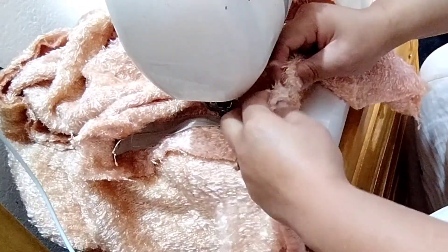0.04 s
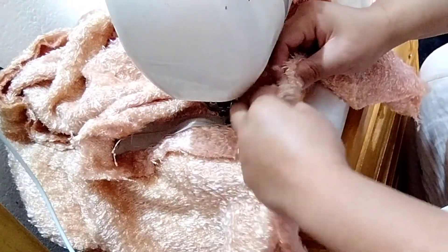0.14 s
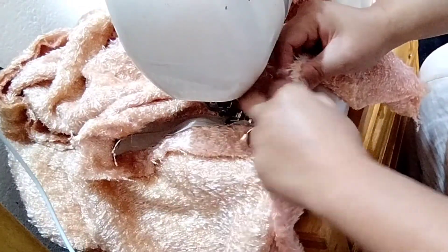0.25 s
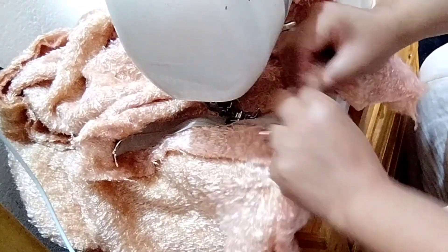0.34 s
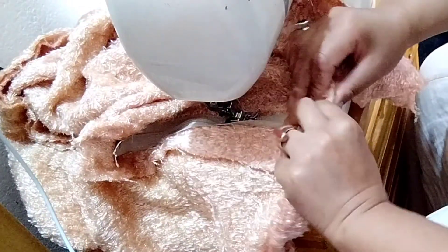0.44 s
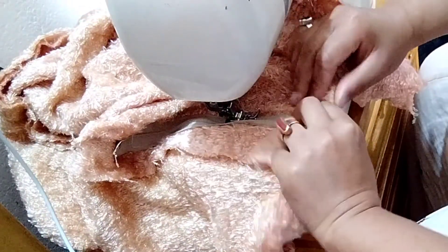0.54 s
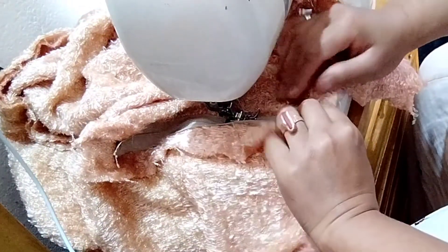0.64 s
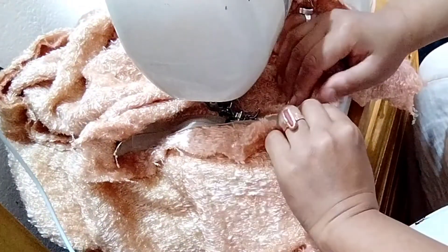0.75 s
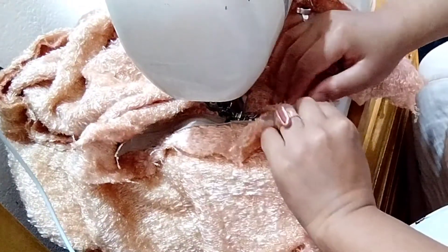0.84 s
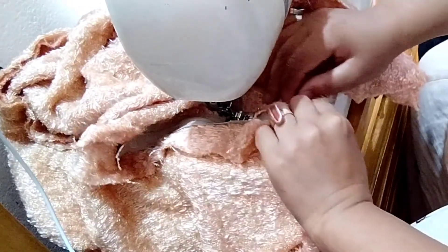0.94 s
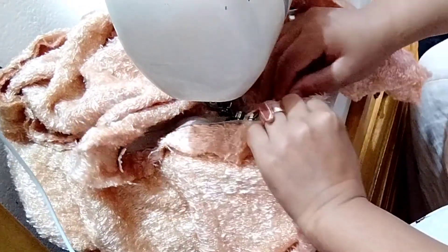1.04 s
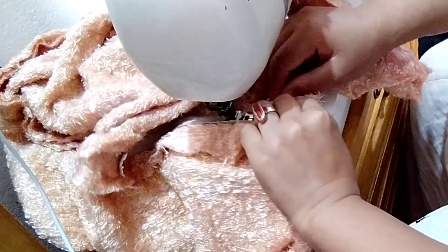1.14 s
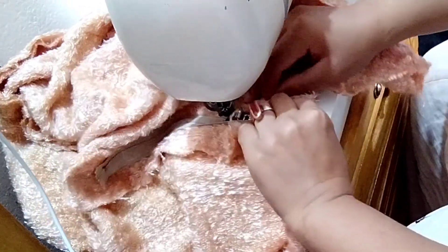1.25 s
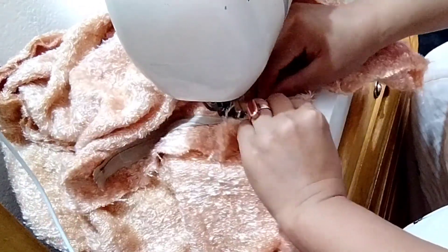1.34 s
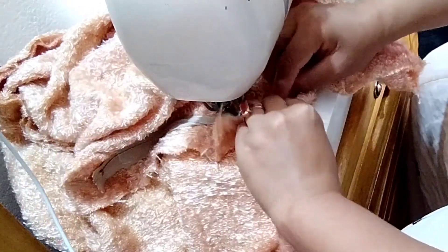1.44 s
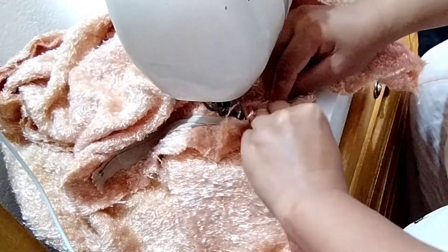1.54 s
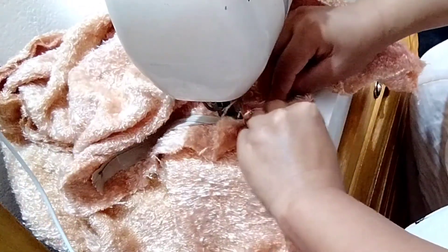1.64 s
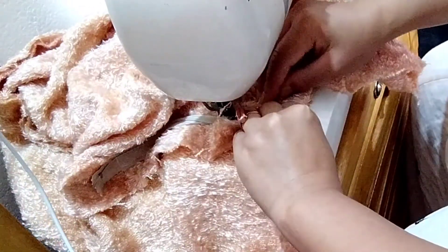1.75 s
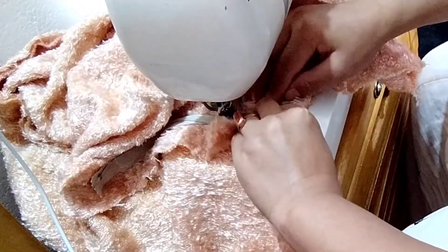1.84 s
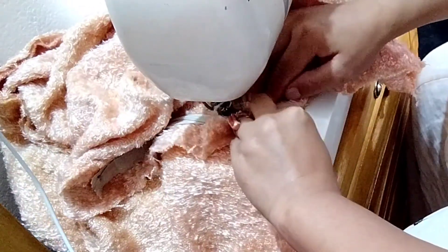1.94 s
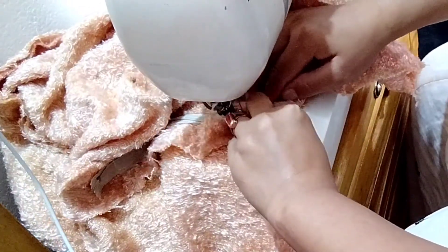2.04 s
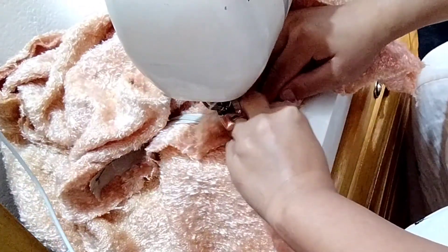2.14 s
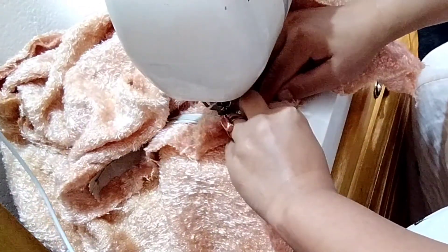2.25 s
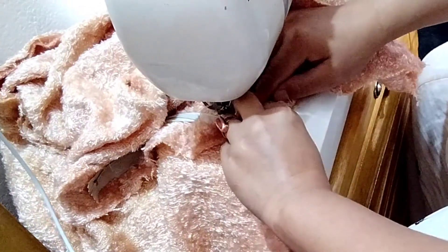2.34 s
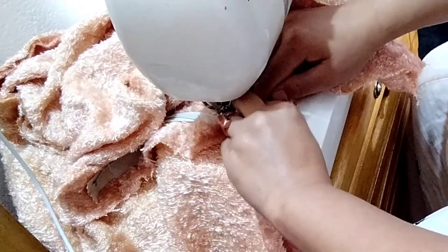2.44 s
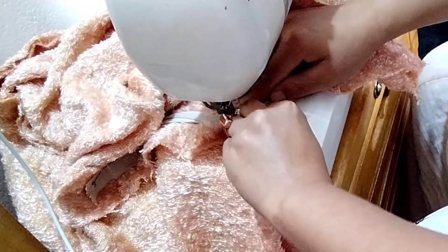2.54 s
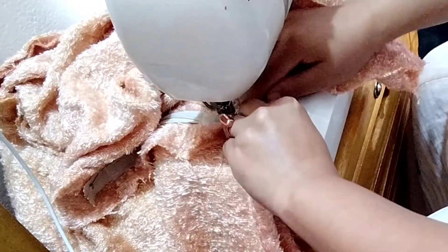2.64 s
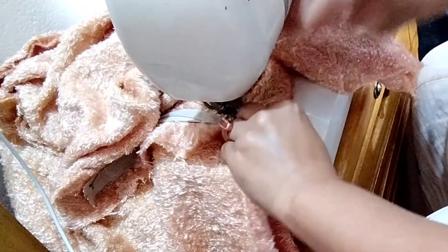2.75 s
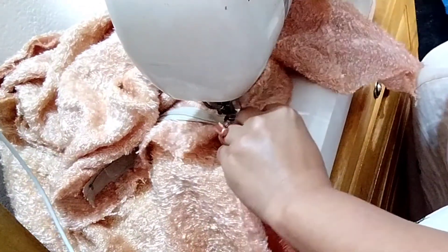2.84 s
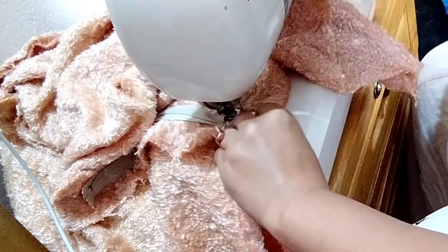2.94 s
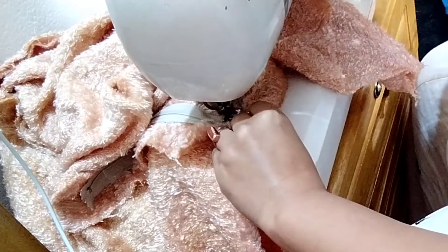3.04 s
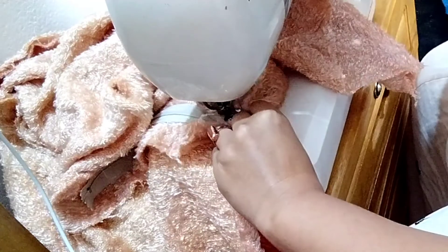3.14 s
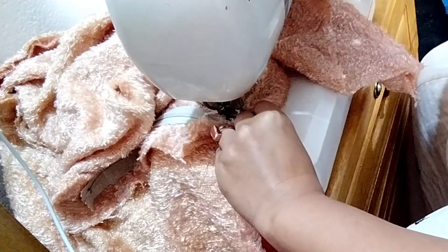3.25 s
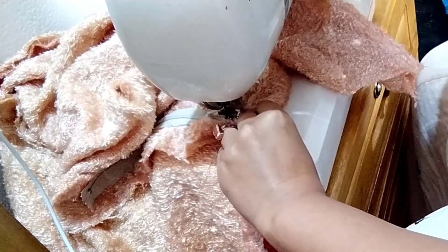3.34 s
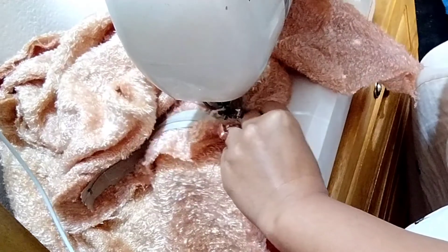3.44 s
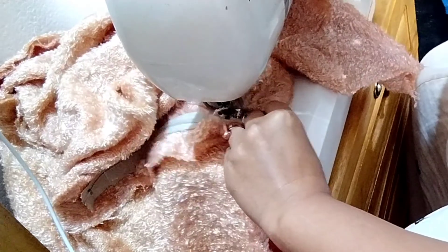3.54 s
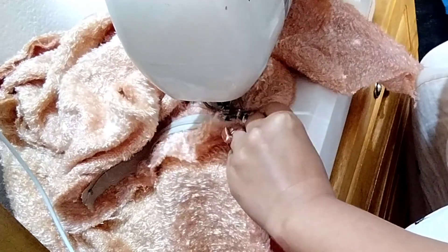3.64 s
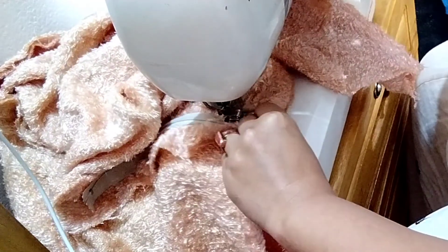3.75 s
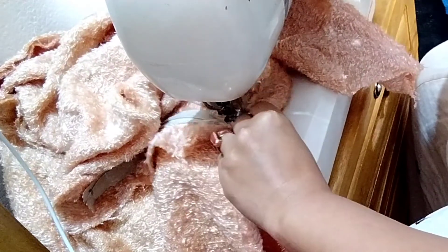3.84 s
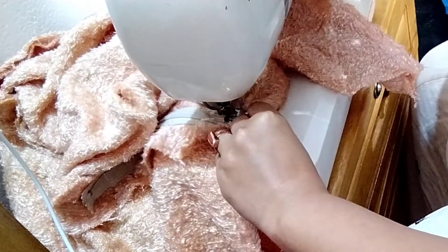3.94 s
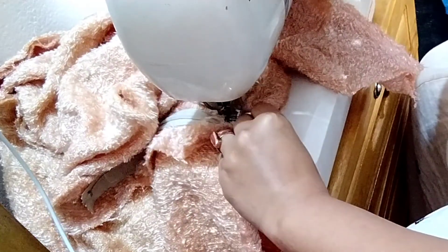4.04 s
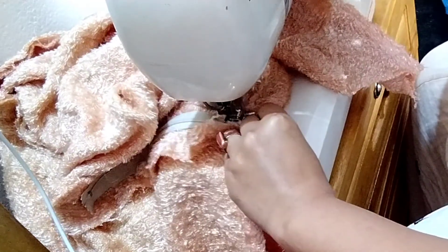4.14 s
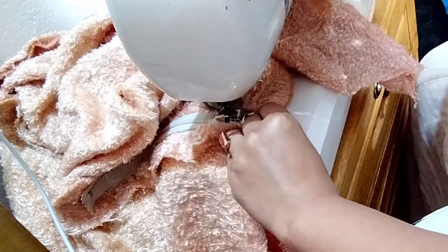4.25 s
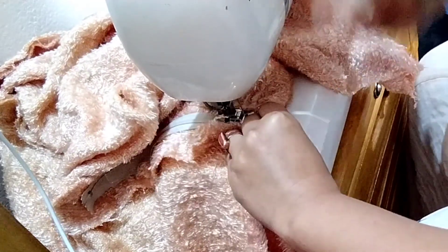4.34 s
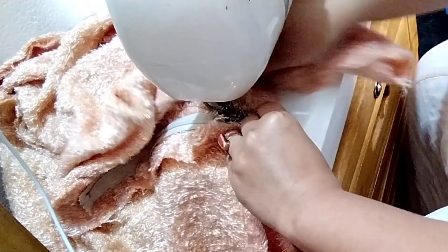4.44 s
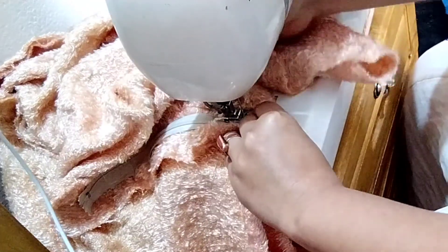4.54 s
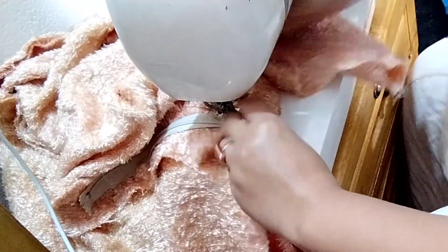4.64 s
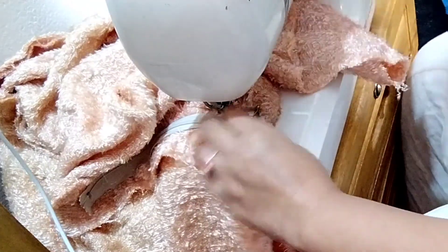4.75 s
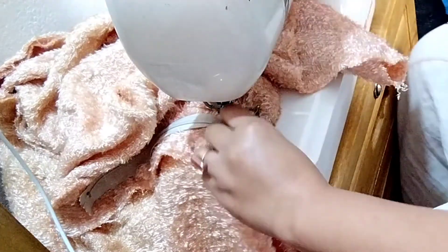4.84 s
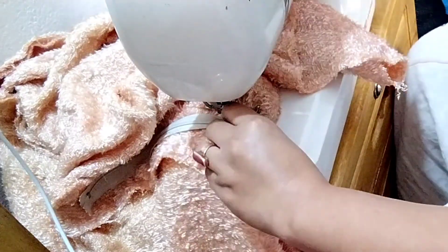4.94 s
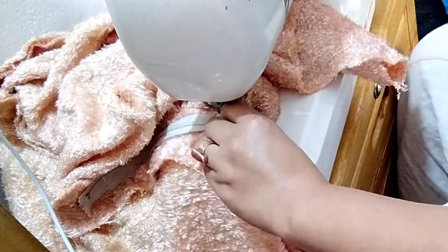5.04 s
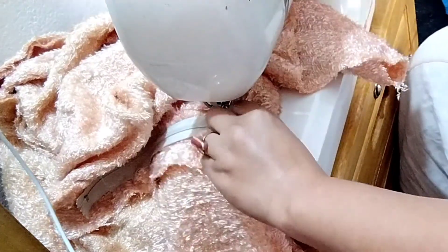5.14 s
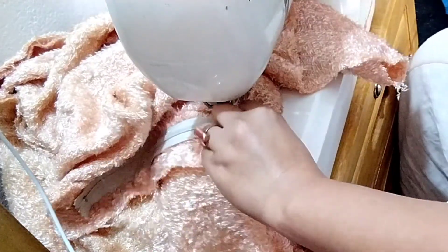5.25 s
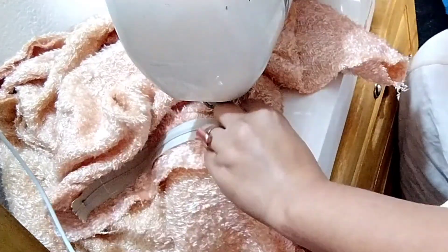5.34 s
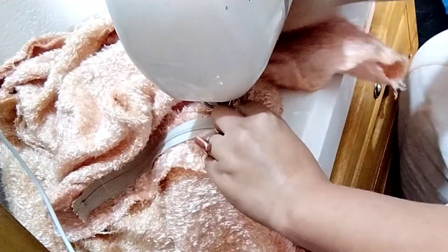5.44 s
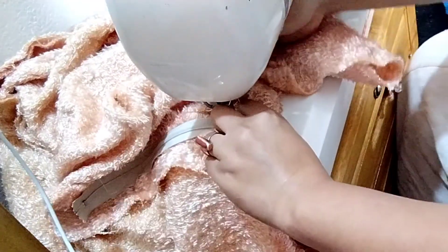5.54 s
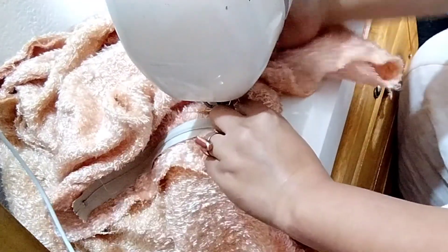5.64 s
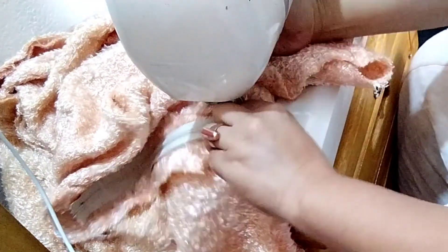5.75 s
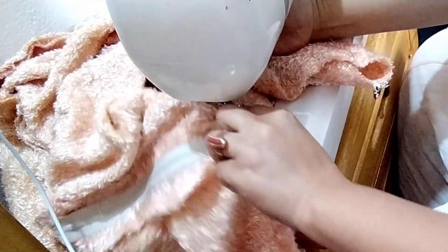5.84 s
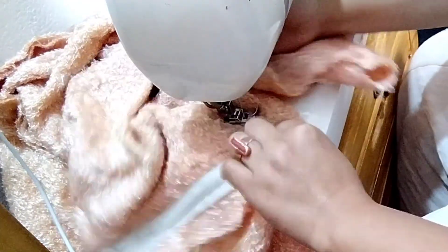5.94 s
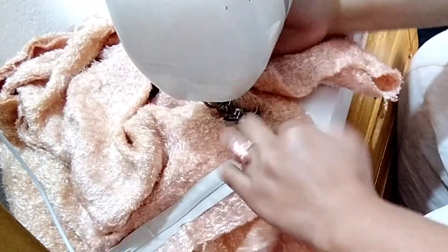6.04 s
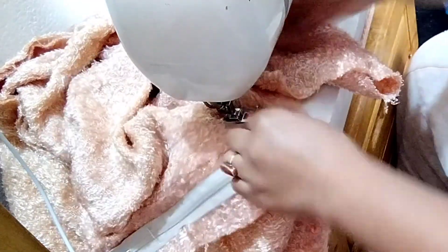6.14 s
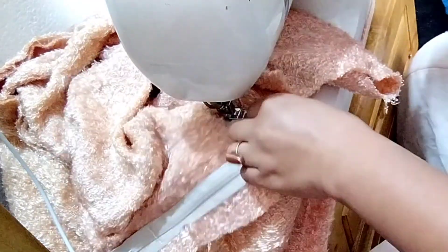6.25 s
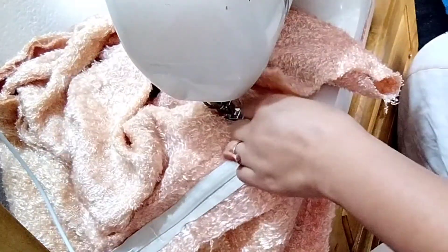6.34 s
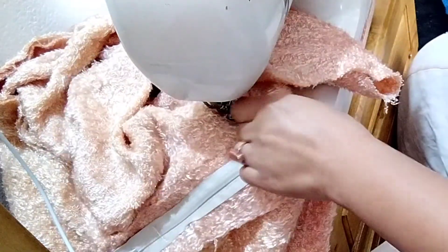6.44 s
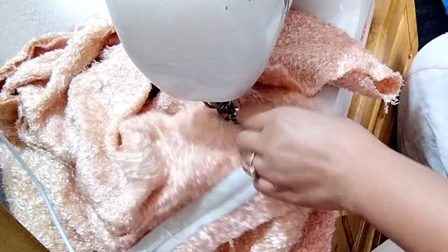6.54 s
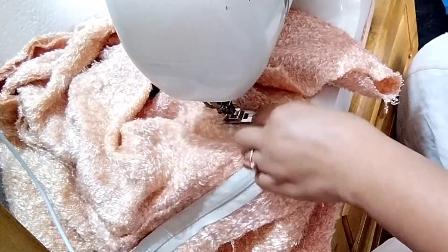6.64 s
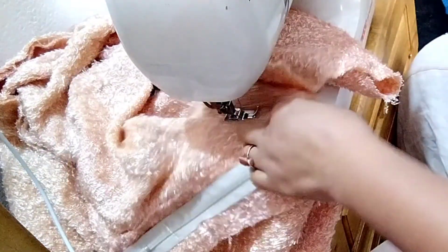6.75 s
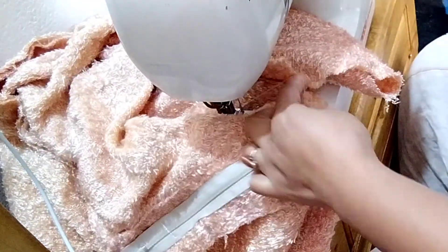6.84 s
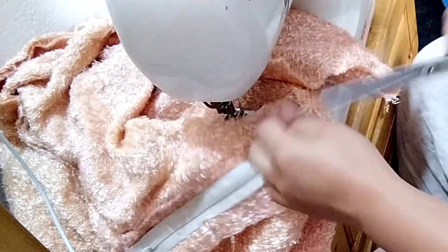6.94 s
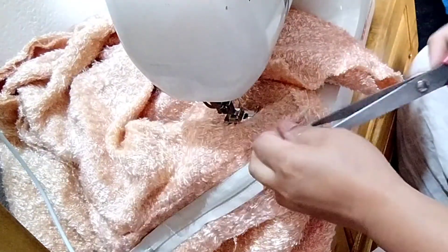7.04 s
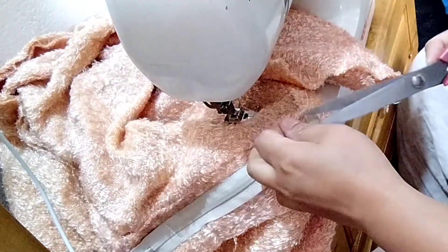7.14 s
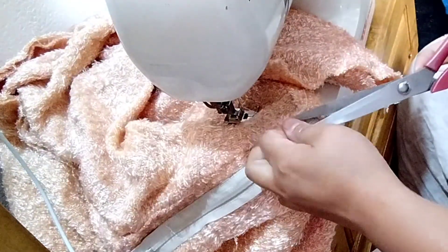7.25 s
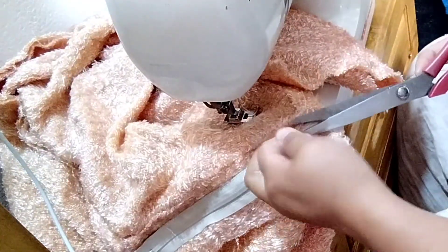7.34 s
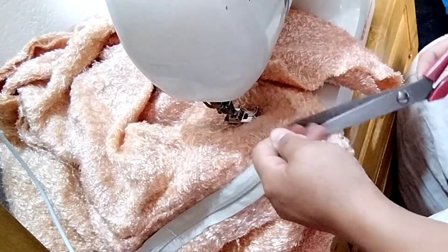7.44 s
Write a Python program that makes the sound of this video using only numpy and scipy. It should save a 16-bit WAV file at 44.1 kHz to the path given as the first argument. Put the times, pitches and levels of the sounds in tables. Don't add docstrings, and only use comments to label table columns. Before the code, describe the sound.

After a nearly silent moment of soft fabric rubbing, an electric sewing machine starts up close by, its motor whirring and gears clacking unevenly as the speed rises and dips. It stops after about four seconds. Then come light knocks and small metal clicks, scissors scraping and clattering off a table edge with a hard thud, and quiet cloth rustle in a small room.

```python
import sys
import numpy as np
from scipy import signal
from scipy.fft import rfft, irfft, next_fast_len
from scipy.io import wavfile
from scipy.ndimage import uniform_filter1d, map_coordinates

SR = 44100
rng = np.random.default_rng(int(sys.argv[2]) if len(sys.argv) > 2 else 0)


def log_audio(samples):
    frames = np.atleast_2d(samples).T
    limited = np.clip(frames, -1, 1)
    pcm = np.round(limited * 32767).astype(np.int16)
    wavfile.write(sys.argv[1], SR, pcm)


def to_linear_factor(level_db):
    exponent = np.asarray(level_db, float) / 20
    return 10 ** exponent


N = 330750

# (time [s], effort [dB], table sway [dB])
MOTOR_LOAD = [(.78, -70, 1.5), (.85, -54, 0.5), (.96, -47, 0), (1.09, -43.5, -1), (1.27, -41, -2.5),
              (1.41, -45.5, -6), (1.56, -52.5, 0.5), (1.68, -44.5, -1.5), (1.86, -43, -6),
              (2.02, -49.5, -1.5), (2.36, -49, -3.5), (2.68, -46.5, 0), (3.25, -43.5, -8.5),
              (3.8, -43.5, -7), (4.13, -42.5, -10), (4.23, -46.5, 1), (4.34, -51, -10), (4.42, -74, -12)]
# (time [s], steel click [dB], housing knock [dB])
HARD_CLACKS = [(0.804, -37, -32.5), (0.8232, -35, -31), (0.9733, -35, -28), (1.2781, -32.5, -20.5),
               (1.4104, -36, -33.5), (1.4864, -36.5, -38), (1.589, -35.5, -32), (1.818, -33.5, -37),
               (1.87, -33, -54), (1.9475, -34, -35), (2.0097, -33, -38), (2.2206, -32.5, -29),
               (2.3485, -31.5, -32), (2.4182, -31, -28.5), (2.482, -32, -26.5), (2.617, -37, -27),
               (2.6529, -35, -36.5), (2.7434, -29, -20.5), (2.8562, -29, -22.5), (2.909, -30, -26),
               (2.981, -37, -41.5), (3.164, -29, -26), (3.4532, -35, -33), (3.547, -33.5, -33),
               (3.6986, -28.5, -22.5), (3.8445, -29.5, -29), (3.993, -30.5, -41), (4.0335, -29, -22),
               (4.1779, -33, -27), (4.323, -29.5, -32)]
# (first [s], last [s], contacts [count])
RUNS = [(.9, .95, 2), (1.051, 1.231, 5), (1.325, 1.344, 2), (1.666, 1.766, 5), (1.79, 1.92, 6),
        (2.147, 2.163, 2), (2.404, 2.497, 2), (2.222, 2.812, 10), (2.885, 2.968, 4), (3.034, 3.062, 2),
        (3.088, 3.141, 3), (3.187, 3.238, 3), (3.282, 3.42, 8), (3.497, 3.72, 9), (3.736, 3.81, 5),
        (3.86, 3.966, 4), (4.087, 4.132, 2), (4.193, 4.193, 1), (4.242, 4.309, 4)]
RUN_CLICK_DB = [-43, -31, -38.5, -37.5, -40.5, -43, -40.5, -38, -36.5, -41.5, -33, -32.5, -38, -41.5, -34.5,
                -37.5, -35.5, -33.5, -53]
# (time [s], strength [dB], weight on the table [dB], metal [dB])
HAND_KNOCKS = [(.697, -62, -22, -34), (.746, -66, 0, -29), (4.523, -58, -9, -17), (4.572, -43, -12, -16.5),
               (4.703, -51.5, -0.5, -10), (4.921, -50, -14, -36.5), (4.982, -41.5, -21, -20),
               (5.001, -43, -44, -14), (5.026, -40.5, -36, -21.5), (5.056, -39, -15, -10.5),
               (5.152, -49, -6, -10), (5.186, -48, -23, -6.5), (5.214, -56, -17, -0.5),
               (5.239, -62, -13, -3), (5.297, -61.5, -18, -14), (5.732, -52, -16, -16),
               (5.744, -53, -29, -9), (5.815, -49, -27, -13), (5.831, -53.5, -20, -2.5),
               (5.863, -63, -12, -3), (5.965, -33, -23, -12), (6.07, -67, -18, -9), (6.317, -75, -6, 6),
               (6.973, -58, -3.5, -10), (7.019, -71, -7, 0), (7.251, -71.5, -4, 2.5),
               (7.289, -78.5, -7, 11.5), (7.424, -56.5, -34, -11.5), (7.484, -75, 5, 9.5)]
# (time [s], strength [dB], weight on the table [dB], blade [dB])
SCISSORS = [(6.412, -26, -62, -21), (6.427, -41.5, -24, -16), (6.441, -35, -30, -17), (6.45, -25, -38, -22),
            (6.469, -34, -39, -17), (6.495, -35, -35, -27), (6.507, -35, -40, -19), (6.521, -43, -23, -29),
            (6.546, -39, -42, -37), (6.56, -47, -18, -26), (6.574, -40, -28, -30), (6.609, -36, -13, -25),
            (6.626, -39.5, -12, -22), (6.648, -42, -20, -41), (6.675, -26.5, -31, -33),
            (6.681, -37, -17, -11.5), (6.693, -33, -23, -19), (6.703, -46, -26, -10)]
# (time [s], level [dB], modes (frequency [Hz], width [Hz], level [dB]))
HANDLE_THUD = (6.6805, -8.5, [(600, 257, 14), (1220, 502, -14)])
# (time [s], level [dB])
SNAPS = [(.697, -80), (.746, -76), (4.572, -58.5), (4.704, -63), (5.751, -63), (5.865, -59), (5.966, -55),
         (6.073, -58.5), (6.411, -58), (6.44, -53), (6.612, -56.5)]
# (from [s], to [s], scuff [dB], rustle over scuff [dB])
RESTING = [
    (0, .8, -71, -23.5),
    (4.38, 7.5, -64.5, -25),
]
# (middle [s], length [s], scuff [dB], rustle over scuff [dB])
STROKES = [(0.133, 0.42, -69.5, -35), (.4, 0.14, -65, -15.5), (.442, 0.085, -68.5, -3.5),
           (0.495, 0.073, -74, -11), (0.698, 0.12, -68, -19), (0.797, 0.043, -44.5, -19),
           (4.504, 1, -67, -17), (5.106, 0.65, -59.5, -16.5), (5.91, 1, -64.5, -17.5), (6.29, 1, -65, -21),
           (6.626, 0.16, -56, -23), (6.81, 0.78, -64.5, -17), (7.5, 0.72, -64.5, -23)]
# (time [s], length [s], frequency [Hz], level [dB])
SQUEAKS = [
    (.06, .16, 8300, -99),
    (5.45, .12, 5550, -89),
    (6.83, .04, 3050, -82),
    (7.08, .14, 4400, -93),
]

# (frequency [Hz], width [Hz], level [dB])
TABLE_MODES = [(106.3, 43.6, -8), (124.8, 9, 6)]
# (frequency [Hz], width [Hz], level [dB])
DAMPED_TABLE = [(118, 13.5, 0)]
# (frequency [Hz], width [Hz], level [dB])
BED = [(187, 37.5, -5.5), (265, 22.7, -1), (352.8, 36.3, -1), (428.7, 46.6, -5), (512, 95, -13.5)]
# (frequency [Hz], width [Hz], level [dB])
HOUSING = [(650.5, 102, 2.5), (753, 95, 4), (816, 43.3, 4.5), (958.5, 99, 2), (1124, 270, -3.5),
           (1382, 157, 1), (1638, 282, 0), (1812, 733, -4.5), (2935, 150, -19.5)]
# (frequency [Hz], width [Hz], level [dB])
EDGE = [(570, 90, 4), (746, 300, -3.5), (1060, 110, 2.5), (1230, 260, -2.5), (1415, 114, 0.5),
        (2200, 510, -12.5)]
# (frequency [Hz], width [Hz], level [dB])
PANEL = [(266.4, 19.6, 1.5), (382, 44, -0.5)]
# (frequency [Hz], width [Hz], level [dB])
BLADES = [(2595, 90, 11.5), (3030, 84, 8), (3560, 170, -0.5), (5000, 1000, -11.5), (7470, 340, -8),
          (14000, 2500, -27)]

# (frequency [Hz], density [dB per Hz])
STEEL = [(1470, 2.5), (2500, -1.5), (3580, -1.5), (4970, -12.5), (5660, -7.5), (7560, -9.5), (10700, -23.5),
         (12400, -28), (14800, -17), (15500, -36)]
# (frequency [Hz], density [dB per Hz])
TICK = [(2500, -41), (4000, -4), (6300, 4), (7800, 6.5), (9700, -7), (12200, -11.5), (14500, -15.5),
        (16000, -6.5)]
# (frequency [Hz], density [dB per Hz])
SCUFF = [(15, -62), (30, -23), (60, -13.5), (120, 1), (180, -6.5), (350, -5), (450, -10), (650, -16.5),
         (1000, -14), (1500, -15), (2200, -26.5), (5000, -42.5), (9000, -96)]
# (frequency [Hz], density [dB per Hz])
FIBRE = [(1180, -29), (2000, -2), (2250, -2), (3800, -0.5), (6140, -7), (11600, -16), (15500, -11.5)]
# (frequency [Hz], level over the sway [dB])
TABLE_HUM = [(121, -1)]
# (frequency [Hz], level re drone [dB])
BED_HUM = [(267, -10), (368, -9.5)]
# (frequency [Hz], t60 [s])
ROOM_T60 = [(100, 0.34), (1000, 0.17), (4000, 0.24), (12000, 0.082)]

START_S, SPIN_UP_S = .772, .04
BED_OVER_DB, GEARS_OVER_DB = 2.5, -4
SLACK_S, SCATTER_DB, MERGE_S = .0015, 1.6, .011
KNOCK_OVER_DB, KNOCK_SCATTER_DB = 4.5, 2.5
THUMP_OVER_DB, THUMP_SCATTER_DB = -5, 1.5
SELF_NOISE_DB, TOP_HZ = -101, 15750


def drive():
    t = np.arange(N) / SR
    effort_db, sway_db = levels(MOTOR_LOAD)
    spin_up = np.clip((t - START_S) / SPIN_UP_S, 0, 1) ** 2
    whirr = to_linear_factor(effort_db) * spin_up * (t < MOTOR_LOAD[-1][0])
    boom = whirr * to_linear_factor(sway_db)
    drone = whirr * to_linear_factor(BED_OVER_DB)
    hiss = whirr * to_linear_factor(GEARS_OVER_DB)
    load = wobble(23.835)
    even = to_linear_factor(.7 * load)
    loose = chatter(90, spread_db=4.5, life_s=0.0042)

    table = through(boom * to_linear_factor(3.0) * gritty(1.42, 40), TABLE_MODES) + boom * hum(TABLE_HUM)
    bed = through(drone * even * gritty(1.4, 150), BED) + drone * hum(BED_HUM)
    shake = 0.69 * gritty(2.2, 300) + 0.34 * loose + .65 * teeth(350, spread_db=2.5)
    housing = soft(through(whirr * even * to_linear_factor(2.5) * shake, HOUSING), 5630)
    grind = gritty(0.74, 400) + 0.75 * loose
    steel = through(hiss * to_linear_factor(1.54 * load - 2.0) * grind, STEEL)
    ticks = through(hiss * to_linear_factor(-15.5) * chatter(48, spread_db=9.5, life_s=0.0015), TICK)
    return table + bed + housing + steel + ticks


def teeth(rate_hz, spread_db):
    taps = (rng.random(N) < rate_hz / SR) * rng.standard_normal(N)
    return unit(taps * to_linear_factor(spread_db * wobble(60)))


def chatter(rate_hz, spread_db, life_s):
    hardness = np.minimum(rng.exponential(size=N), 2.5)
    ticks = (rng.random(N) < rate_hz / SR) * to_linear_factor(spread_db * hardness)
    decay = signal.lfilter([1], [1, -np.exp(-1 / (life_s * SR))], ticks)
    return unit(decay * rng.standard_normal(N))


def hum(lines):
    out = np.zeros(N)
    for hz, db in lines:
        level = to_linear_factor(db + 3.3 * wobble(9))
        phase = 2 * np.pi * np.cumsum(hz + 6 * wobble(20)) / SR
        out += level * np.sin(phase)
    return out


def linkage():
    s, click_db, thump_db, knock_db = linkage_contacts()
    tick = through(bursts(s - .0006, click_db - 9.5, contact_s=0.0019), TICK)
    click = through(bursts(s - .0025, click_db - 7.5, contact_s=0.0046), STEEL)
    blow = bursts(s - .0025, knock_db - 12, contact_s=0.0057) + pushes(s + 0.002058, knock_db + 9)
    knock = soft(through(blow, HOUSING), 5200)
    thump = through(pushes(s + 0.0011, thump_db + 12.0), BED)
    return tick + click + knock + thump


def linkage_contacts():
    runs = [(s, db) for (a, b, n), db in zip(RUNS, RUN_CLICK_DB) for s in np.linspace(a, b, n)]
    s, click_db = np.transpose(runs)
    hard_s, hard_db, hard_knock_db = np.transpose(HARD_CLACKS)
    n = len(s)
    play = np.clip(rng.standard_normal((n + len(HARD_CLACKS), 4)), -2, 2)
    merged = np.abs(s[:, None] - hard_s).min(axis=1) < MERGE_S
    s = s + SLACK_S * play[:n, 0]
    click_db = click_db + SCATTER_DB * play[:n, 1] - 100 * merged
    run_knock_db = click_db + KNOCK_OVER_DB + KNOCK_SCATTER_DB * play[:n, 2]
    knock_db = np.append(run_knock_db, hard_knock_db)
    thump_db = knock_db + THUMP_OVER_DB + THUMP_SCATTER_DB * play[:, 3]
    return np.append(s, hard_s), np.append(click_db, hard_db), thump_db, knock_db


def handling(contacts, bright, middle, low, soft_hz, blow_db, contact_s, thump_db, share):
    s, knock_db, weight_db, metal_db = np.transpose(contacts)
    contact_s = contact_s * to_linear_factor(-.12 * (metal_db + 14.5))
    rattle = through(bursts(s - .002, knock_db + metal_db - 3.5, 1.33 * contact_s), bright)
    blow = bursts(s - .002, knock_db - 10, 1.7 * contact_s)
    blow = blow + pushes(s + 0.327 * contact_s, knock_db + blow_db)
    knock = soft(soft(through(blow, middle), soft_hz), soft_hz)
    thump = soft(through(pushes(s + contact_s, knock_db + share * weight_db + thump_db), low), 940)
    late_push = pushes(s + 2.41 * contact_s, knock_db + weight_db + 28)
    boom = soft(through(late_push, DAMPED_TABLE), 240)
    return rattle + knock + thump + boom


def thud():
    s, db, modes = HANDLE_THUD
    return soft(through(pushes(np.array([s]), db), modes), 2200)


def snaps():
    s, db = np.transpose(SNAPS)
    return through(bursts(s - .001, db, contact_s=0.00063), FIBRE)


def cloth():
    scuff, rustle = hand_motion()
    dull = through(patchy(3.1), SCUFF)
    clumps = patchy(2.6) * to_linear_factor(1.5 * wobble(30)) * to_linear_factor(2.6 * wobble(220))
    fine = through(clumps, FIBRE)
    return scuff * to_linear_factor(1.3 * wobble(37) - 4.0) * dull + rustle * to_linear_factor(1.0) * fine


def hand_motion():
    t = np.arange(N) / SR
    power = np.zeros((2, N))
    for a, b, db, over_db in RESTING:
        power += (((t >= a) & (t < b)) * to_linear_factor([[db], [db + over_db]])) ** 2
    for s, length_s, db, over_db in STROKES:
        swell = np.cos(np.pi * np.clip((t - s) / length_s, -.5, .5)) ** 2
        power += (swell * to_linear_factor([[db], [db + over_db]])) ** 2
    return np.sqrt(power)


def squeaks():
    out, t = np.zeros(N), np.arange(N) / SR
    for s, length_s, hz, db in SQUEAKS:
        swell = to_linear_factor(db + 23) * np.sin(np.pi * np.clip((t - s) / length_s, 0, 1))
        narrow = signal.butter(2, [hz - 70, hz + 70], "band", fs=SR, output="sos")
        out += signal.sosfilt(narrow, swell * rng.standard_normal(N))
    return out


def room(x):
    out, step = np.zeros(N + SR), SR // 4
    for i in range(0, N, step):
        hz, t, z = signal.stft(rng.standard_normal(SR // 3), SR, nperseg=256)
        decay = to_linear_factor(-60 * t / along(ROOM_T60, hz)[:, None])
        tail = signal.istft(z * decay, SR, nperseg=256)[1]
        wet = signal.fftconvolve(x[i:i + step], tail / np.linalg.norm(tail))
        out[i + 200:][:len(wet)] += wet
    return out[:N]


def bursts(times, db, contact_s):
    force, t = np.zeros(N + SR), np.arange(SR // 8) / SR
    for s, level_db, c in zip(times, db, np.broadcast_to(contact_s, len(times))):
        u = t / max(c, .0003)
        swell = (u * np.exp(1 - u)) ** 1.29
        force[round(s * SR):][:len(t)] += to_linear_factor(level_db) * swell * rng.standard_normal(len(t))
    return force[:N]


def pushes(times, db):
    force = np.zeros(N)
    force[np.round(times * SR).astype(int)] = to_linear_factor(db) * rng.choice([-1, 1], size=len(times))
    return force


def through(x, body):
    m = next_fast_len(N + SR // 2)
    f = np.fft.rfftfreq(m, 1 / SR)
    if len(body[0]) == 2:
        h = to_linear_factor(along(body, f))
    else:
        h = 0
        for k, (hz, width_hz, db) in enumerate(body):
            mode = 1j * f * width_hz / (hz * hz - f * f + 1j * f * width_hz)
            h = h + (-1) ** k * to_linear_factor(db) * mode
    return irfft(rfft(x, m) * h / np.sqrt(np.mean(np.abs(h) ** 2)), m)[:N]


def soft(x, hz):
    return signal.sosfilt(signal.butter(2, hz, fs=SR, output="sos"), x)


def gritty(rough_db, rate_hz):
    return unit(rng.standard_normal(N) * to_linear_factor(rough_db * wobble(rate_hz)))


def patchy(depth_db):
    z = signal.stft(rng.standard_normal(N), nperseg=512)[2]
    field = uniform_filter1d(rng.standard_normal(z.shape), 5, 0)
    field = uniform_filter1d(field, 12, 1)
    return unit(signal.istft(z * to_linear_factor(depth_db * unit(field)), nperseg=512)[1][:N])


def wobble(rate_hz):
    knots = rng.standard_normal(int(N * rate_hz / SR) + 4)
    return map_coordinates(knots, [np.arange(N) * rate_hz / SR])


def levels(rows):
    s, *columns = np.transpose(rows)
    return [np.interp(np.arange(N) / SR, s, c) for c in columns]


def along(points, hz):
    f, v = np.transpose(points)
    return np.interp(np.log(hz + 1), np.log(f + 1), v)


def unit(x):
    return x / np.sqrt(np.mean(x ** 2) + 1e-20)


def scene():
    machine = drive() + linkage()
    hands = handling(HAND_KNOCKS, STEEL, HOUSING, BED, soft_hz=3420, blow_db=10.5,
                     contact_s=0.00556, thump_db=21.5, share=0.2)
    scissors = handling(SCISSORS, BLADES, EDGE, PANEL, soft_hz=2650, blow_db=4.5,
                        contact_s=0.0028, thump_db=25.5, share=0.32)
    small_table = signal.butter(4, 62, "high", fs=SR, output="sos")
    near = signal.sosfilt(small_table, machine + hands + scissors + thud() + snaps())
    return (near + to_linear_factor(-13.0) * room(near) + cloth() + squeaks())[None]


def top_cut(x):
    return signal.sosfilt(signal.butter(12, 16470, fs=SR, output="sos"), x)


def record(dry):
    spectrum = rfft(dry + to_linear_factor(SELF_NOISE_DB) * rng.standard_normal(dry.shape))
    heard = irfft(spectrum * (np.fft.rfftfreq(N, 1 / SR) < TOP_HZ), N)
    return top_cut(heard)


dry = scene()
out = record(dry)
log_audio(out)
```